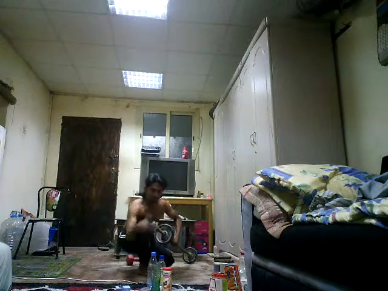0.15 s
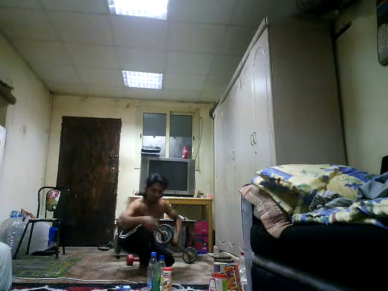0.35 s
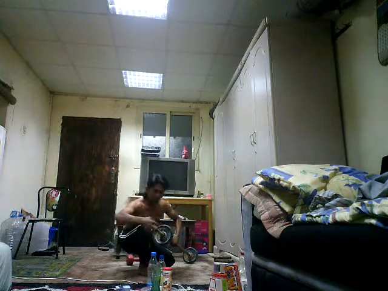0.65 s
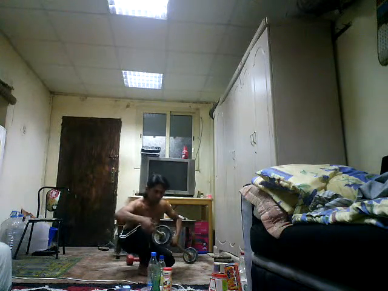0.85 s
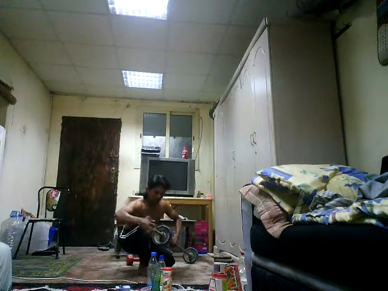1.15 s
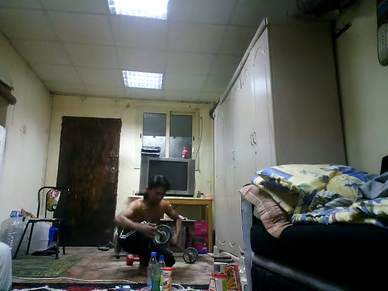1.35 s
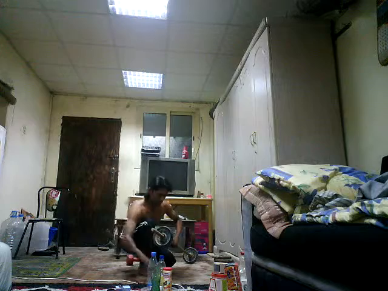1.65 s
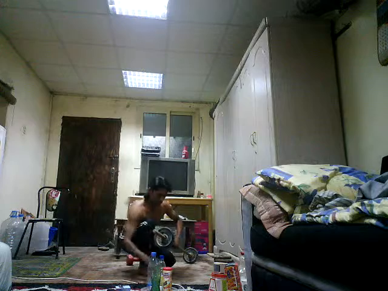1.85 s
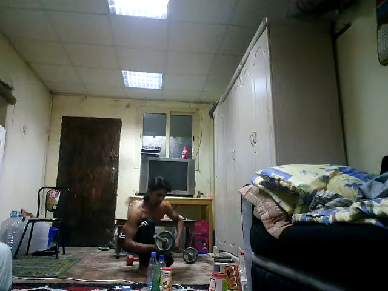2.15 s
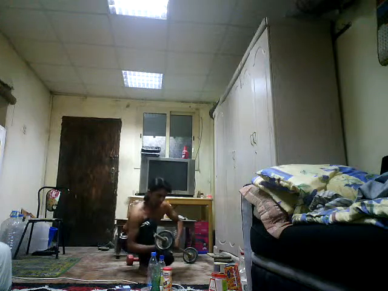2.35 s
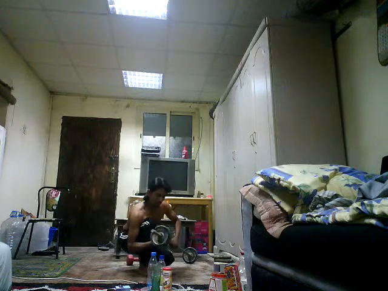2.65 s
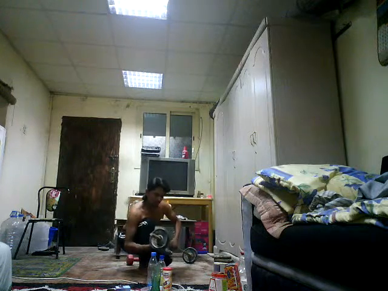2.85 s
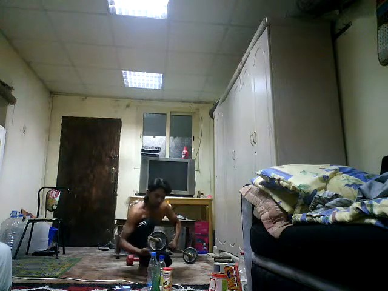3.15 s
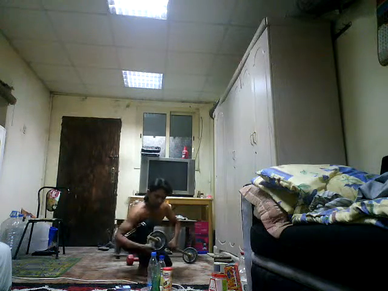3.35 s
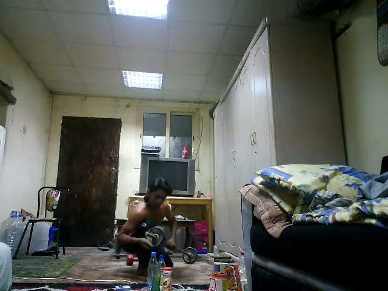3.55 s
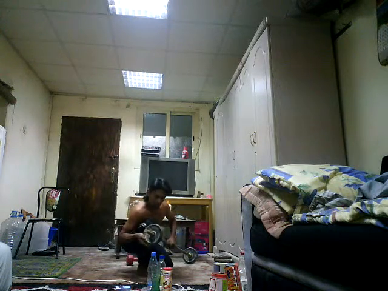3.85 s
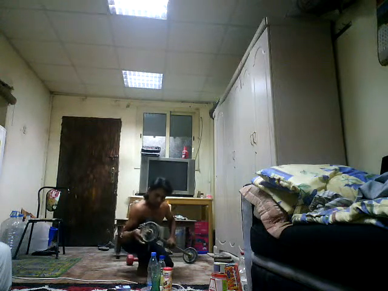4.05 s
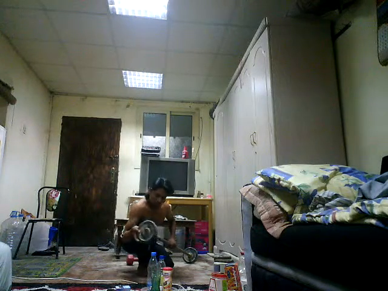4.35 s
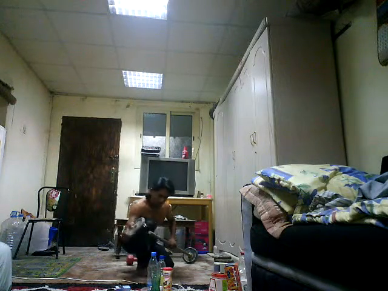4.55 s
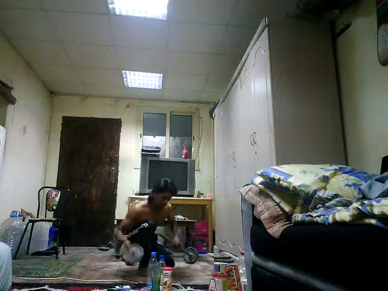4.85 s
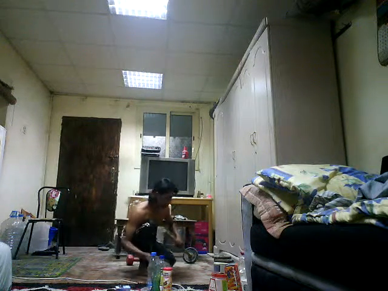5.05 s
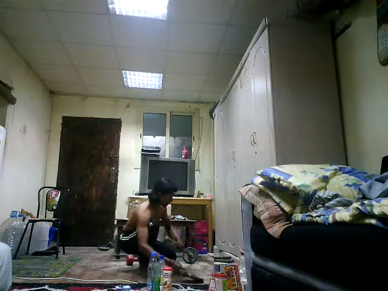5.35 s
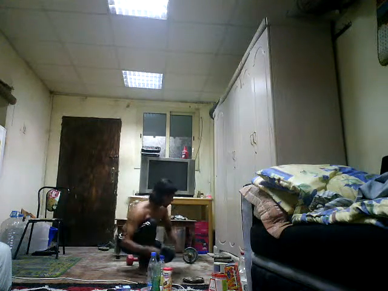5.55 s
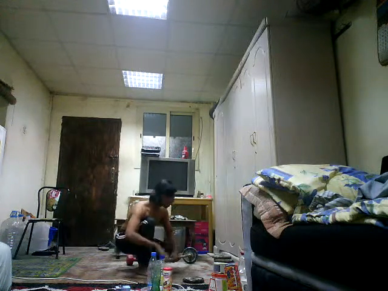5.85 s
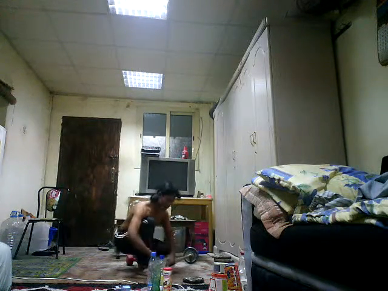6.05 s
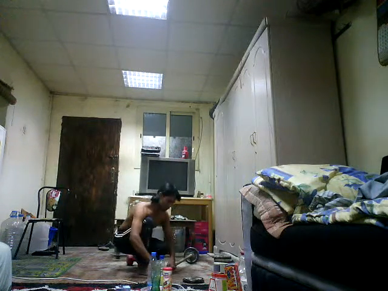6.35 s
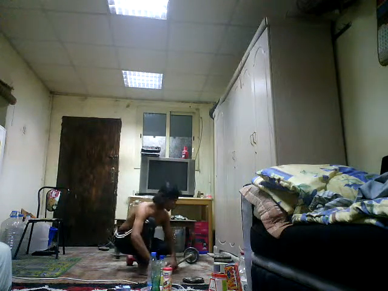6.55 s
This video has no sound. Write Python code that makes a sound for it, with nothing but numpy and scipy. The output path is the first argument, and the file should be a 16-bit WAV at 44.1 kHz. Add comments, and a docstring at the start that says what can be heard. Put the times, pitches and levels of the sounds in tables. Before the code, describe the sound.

In a small, lightly echoing room, a dumbbell collar is spun loose with faint, quickening clinks. A soft floor thump follows, then iron plates scrape, chatter and clank brightly on the steel bar in two bursts. After a short pause a weight drops onto carpet with a loud dull thud and a smaller bounce. The fixed microphone, a few metres away, adds low rumble, hum and steady hiss.

```python
"""In a small bedroom, a dumbbell is stripped: its collar clinks as it is spun loose, then iron plates
scrape and chatter off the steel bar. Weights meet the carpeted floor, last a plate with a dull thud.
Metal is made of noise cracks and dying tones, repeated by tiny slips; thuds add a floor boom.
Shaped noise makes the low rumble and microphone hiss, and sine waves make the hum."""
import sys
import numpy as np
from scipy import signal
from scipy.fft import rfft, irfft, next_fast_len
from scipy.io import wavfile
from scipy.ndimage import map_coordinates

SR = 44100
rng = np.random.default_rng(int(sys.argv[2]) if len(sys.argv) > 2 else 0)


def generate_wav(signal):
    """Clip the signal to [-1, 1] and save it as 16-bit WAV at the path in sys.argv[1]."""
    frames = np.transpose(np.atleast_2d(signal))
    scaled = np.clip(frames, -1, 1) * 32767
    pcm = np.round(scaled).astype(np.int16)
    wavfile.write(sys.argv[1], SR, pcm)


N = 295822
T = np.arange(SR * 3 // 4) / SR  # time within one blow, in seconds

# Tone colour of iron striking hard. Each row: frequency in Hz, relative level in dB.
CLACK_COLOUR = [(300, -30), (700, -12), (1200, -9), (1900, -3), (2500, -3), (3200, 1), (3800, -5),
                (4300, -16), (4900, -21), (5550, -18), (6100, -32), (7300, -46), (11000, -41), (15500, -45)]

CLANK_LEAD_S = 0.015  # a plate scrapes this long before it strikes
NEUTRAL_DB = -24.5  # level of a blow that is neither hard nor soft


def amp(db):
    """Turn decibels into a gain."""
    return 10 ** (np.asarray(db) / 20)


def unit(x):
    """Scale a sound to rms 1."""
    return x / np.sqrt(np.mean(x ** 2) + 1e-20)


def blow(x):
    """Scale each channel to the energy of 30 ms at rms 1, so that short and long blows compare."""
    energy = np.sum(x ** 2, axis=-1, keepdims=True)
    return x / np.sqrt(energy / (0.03 * SR) + 1e-20)


def along(points, hz):
    """Read a curve of (Hz, value) points at any frequency, on a log axis."""
    point_hz, value = np.transpose(points)
    return np.interp(np.log(hz + 1), np.log(point_hz + 1), value)


def filtered(x, gain):
    """Multiply the spectrum by a gain that depends on frequency."""
    n = x.shape[-1]
    padded = next_fast_len(n + 4096, True)  # spare silence between the end and the start
    spectrum = rfft(x, padded) * gain(np.fft.rfftfreq(padded, 1 / SR))
    return irfft(spectrum, padded)[..., :n]


def coloured(x, colour):
    """Shape a sound with a curve of (Hz, dB) points."""
    return filtered(x, lambda hz: amp(along(colour, hz)))


def add(track, s, sound):
    """Mix a sound into the track from time s in seconds."""
    part = track[:, max(0, round(s * SR)):][:, :sound.shape[1]]
    part += sound[:, :part.shape[1]]


def burst(colour, t60, attack):
    """A coloured noise crack that swells and dies with the room's echoes, as mid and side."""
    noise = coloured(rng.standard_normal((2, len(T))), colour)
    return blow(noise * amp(-60 * T / t60) * (1 - np.exp(-T / attack)))


def decays(modes, attack):
    """One dying complex sine for each mode (Hz, dB, seconds to fall 60 dB), swelling as the room fills."""
    hz, db, t60 = np.transpose(modes)[:, :, None]
    swell = 1 - np.exp(-T / attack)
    return amp(db - 60 * T / t60) * np.exp(2j * np.pi * hz * T) * swell


def ring(waves, scatter_db):
    """Each blow rings the modes at new strengths and phases; side is about a quarter cycle off mid."""
    count = len(waves)
    mid = amp(scatter_db * rng.standard_normal(count)) * np.exp(2j * np.pi * rng.random(count))
    side = mid * 1j * np.exp(0.5j * rng.standard_normal(count))
    return blow((np.array([mid, side]) @ waves).real)


def chatter(sound, lead, scrape_db, bounce_db, count=16):
    """Tiny slips swell from nothing up to the main contact, and the parts bounce for as long again."""
    n = max(2, round(lead * SR))
    when = (np.arange(count) + rng.random(count)) * 2 / count - 1  # -1 to 1, main contact at 0
    level = amp(np.where(when < 0, scrape_db, bounce_db))
    size = rng.choice([-1, 1], count) * (1 - abs(when)) * level
    force = np.bincount(((when + 1) * n).astype(int), size, 2 * n + 1)
    force[n] = 1  # the main contact
    return blow(signal.fftconvolve(sound, force[None], axes=1))


def walls(sound, wet_db):
    """Add the room's answer as dying noise, new for each contact; the energy is evened out again."""
    # How long the room answers. Each row: frequency in Hz, time to fall 60 dB in seconds.
    room_fade = [(100, 0.48), (250, 0.502), (600, 0.057), (2000, 0.25), (5000, 0.3), (12000, 0.24)]
    hz, t, z = signal.stft(rng.standard_normal((2, SR // 3)), SR, nperseg=256)
    fade = amp(-60 * t / along(room_fade, hz)[:, None])
    tail = signal.istft(z * fade, SR, nperseg=256)[1]
    tail *= amp(wet_db) / np.linalg.norm(tail[0])
    tail[:, 0] += 1  # the direct sound
    return blow(signal.fftconvolve(sound, tail, axes=1)[:, :sound.shape[1]])


def background():
    """Steady shaped noise gives rumble and microphone hiss; sines of drifting phase give electric hum."""
    # Tone colour of the room rumble. Each row: frequency in Hz, relative level in dB.
    rumble_colour = [(12, -48.5), (20, -23), (59, -1), (82, -13.5), (109, -6), (166, -6), (198, -2.5),
                     (387, -12.5), (431, -14.5), (566, -17.5), (1500, -33), (1950, -58.5), (3300, -120)]
    # Tone colour of the microphone hiss. Each row: frequency in Hz, relative level in dB.
    hiss_colour = [(500, -30.5), (1000, -4.5), (2000, -1.5), (3000, -0.5), (4700, 0.5), (7000, -8.5),
                   (9500, -6.5), (11500, 1), (12900, -1.5), (13400, 0.5), (15500, -4)]
    # Stereo width of both noises. Each row: frequency in Hz, side over mid in dB.
    air_width = [(30, 1), (100, -5.5), (300, -4.5), (700, 0.5), (1500, -2), (4000, 1.5), (7000, 8),
                 (15000, 5.5)]
    # Tones of the electric hum. Each row: frequency in Hz, rms level in dB.
    hum_tones = [(58.5, -86), (115, -63.5), (199, -63), (233, -71)]

    def noise(colour):
        return unit(coloured(rng.standard_normal((2, N)), colour))

    mid, side = amp(-56.0) * noise(rumble_colour) + amp(-57.0) * noise(hiss_colour)
    side = coloured(side, air_width)
    t = np.arange(N) / SR
    for hz, db in hum_tones:
        # the phase wanders smoothly between about two random values a second
        drift = map_coordinates(rng.standard_normal(64), [t * 2.05], mode="mirror")
        mid = mid + amp(db) * np.sqrt(2) * np.sin(2 * np.pi * hz * t + 0.8 * drift)
    return np.array([mid + side, mid - side])


def thuds():
    """The carpet softens each landing; floor and room boom, and the iron gives a short damped clack."""
    # Weights meeting the floor. Each row: start in seconds, relative level in dB,
    # relative level of the metal clack against it in dB, softness in dB per octave (more is duller).
    landings = [(.372, -55.5, -9, -5.5), (1.956, -36.5, -13.5, 4.5), (2.146, -41.5, -18.5, 3.5),
                (2.239, -58, -8, 28), (5.42, -35.5, -15.5, 10), (5.432, -37.5, -25, 13),
                (5.600, -17, -13.5, -1), (5.680, -27.5, -16, 5)]
    # Boom of floor and room. Each row: frequency in Hz, relative level in dB, time to fall 60 dB in seconds.
    boom_modes = [(98, -7, .48), (234, -6, .38), (253, 0, .42), (292, -10, .26), (342, -4, .25),
                  (396, -2, .28), (436, -5, .28), (542, -12, .3), (673, -17, .23), (790, -20, .24),
                  (1012, -18, .25)]
    # Tone colour of the thump. Each row: frequency in Hz, relative level in dB.
    thump_colour = [(35, -40), (65, -5), (95, -5), (150, -6), (250, 8), (420, -4), (600, -11), (850, -27),
                    (1020, -16.5), (1200, -60), (2500, -49)]
    push_hz = 418  # the floor's first give under a weight
    rim_colour = [(900, 4), (2000, -3), (2700, 2.5), (3400, 0), (4500, 13), (7500, 7.5), (15000, 26.0)]

    track, boom = np.zeros((2, N)), decays(boom_modes, attack=0.0051)
    for s, db, clack_db, soft_db in landings:
        # the first push on the floor is short, swelling faster than the room's boom
        push = blow(decays([(push_hz, 0, 0.035)], attack=0.0017).imag)
        thump = burst(thump_colour, t60=0.41, attack=0.00092)
        low = amp(-7.0) * push + amp(1) * thump + amp(-5.0) * ring(boom, scatter_db=1.0)
        low = filtered(low, lambda hz: amp(-soft_db * np.log2(np.clip(hz, 130, 1500) / 250)))
        add(track, s, amp(db + 3.5) * blow(low))
        # the rim touches down just after the face
        rim = coloured(burst(CLACK_COLOUR, t60=0.27, attack=0.00092), rim_colour)
        add(track, s + 0.007, amp(db + clack_db - 3.0) * rim)
    # the small room carries little below its lowest mode
    return signal.sosfilt(signal.butter(4, 70, "highpass", fs=SR, output="sos"), track)


def collar():
    """The loose collar rattles on the thread as the hand turns it: noise cracks with a high, short ring."""
    # Clinks of the collar spun along the bar. Each row: time of the strike in seconds, relative level in dB.
    clinks = [(0.155, -56.5), (0.542, -50), (.611, -49), (.773, -55.5), (.854, -41.5), (.974, -50.5),
              (1.068, -38.5), (1.086, -31.5), (1.178, -30.5), (1.244, -38.5), (1.39, -30.5), (1.403, -33),
              (1.556, -42)]
    # The collar's ring. Each row: frequency in Hz, relative level in dB,
    # time to fall 60 dB in seconds before the extra damping below.
    collar_modes = [(794, -8.5, 0.16), (1300, -34, .2), (1980, 0, 0.082), (2575, -2, 0.36),
                    (3072, 2.5, 0.22), (3040, -33, 0.29), (3520, 3.5, 0.19), (3550, -11, 0.38),
                    (3800, -26, .24), (4070, -7, 0.26), (4570, -10, 0.19), (5182, -21.5, 0.26),
                    (5880, -26.5, 0.36), (6340, -39, 0.25), (6840, -54, 0.14), (7460, -54, 0.14),
                    (8600, -41, 0.14)]
    lead_s = 0.016  # the collar scrapes this long before it strikes
    damping = 50  # extra fall of the ring, dB per second
    small_part = [(2500, -4.0), (4300, 0.5), (7000, 12)]  # the small part sounds brighter: (Hz, dB)

    track, waves = np.zeros((2, N)), decays(collar_modes, attack=0.0038)
    for s, db in clinks:
        crack = burst(CLACK_COLOUR, t60=0.23, attack=0.00082)
        hit = crack + amp(-1) * ring(waves * amp(-damping * T), scatter_db=1.0)
        hit = coloured(hit, small_part)
        clink = chatter(hit, lead_s, scrape_db=4, bounce_db=-28)
        add(track, s - lead_s, amp(db - 3.5) * clink)
    return track


def contacts(s, db, rattle_s, count=3):
    """A blow, then the plate falls back on the bar at uneven intervals, ever more weakly: (s, dB)."""
    rebound_s, fall_db = 0.02, 17  # average time between contacts; fall over the length of a rattle
    after = rebound_s * (np.arange(count) + 0.75 + 0.5 * rng.random(count))
    after = np.append(0, after)
    return zip(s + after, db - fall_db * after / max(rattle_s, 0.001))


def clank(bar, grip, bright_db, force_db):
    """One contact of iron on steel: a dense clack and the bar's ring under the hand, amid tiny slips."""
    bar_db = 6.5  # the bar's ring over the clack, for a neutral blow
    # harder blows ring more (dB per dB of force) and are brighter (dB per octave per dB of force)
    ring_per_db, bright_per_db = 0.1, 0.28

    held = walls(ring(bar * amp(-grip * T), scatter_db=3.5), wet_db=-1)
    clack = burst(CLACK_COLOUR, t60=0.28, attack=0.00025)
    hit = clack + amp(bar_db + ring_per_db * force_db) * held
    slope_db = bright_db + bright_per_db * force_db
    hit = filtered(hit[:, :SR // 2], lambda hz: amp(slope_db * np.log2(np.clip(hz, 1000, 7000) / 3000)))
    return chatter(hit, CLANK_LEAD_S, scrape_db=-2.5, bounce_db=-9)


def plates():
    """Plates catch, slip and rattle on the bar; each blow adds a low knock and the plate's own tones."""
    # Plates against the bar. Each row: time of the strike in seconds, relative level in dB,
    # length of the rattle after it in seconds, level of the low knock in dB.
    clanks = [(2.512, -54.5, 0.047, -46), (2.642, -46.5, 0.018, -38), (2.708, -38, .04, -55),
              (2.738, -28, 0.18, -48), (2.778, -21.5, 0.081, -39.5), (2.831, -17, .045, -38),
              (3.662, -36.5, .015, -43.5), (3.746, -27, 0.088, -39.5), (3.796, -16, 0.023, -38),
              (3.829, -16.5, 0.053, -31.5), (4.069, -22.5, 0.039, -36), (4.137, -30.5, 0.017, -44),
              (4.157, -27, 0.025, -44), (4.189, -12.5, 0.064, -35), (4.227, -18, 0.016, -39.5),
              (4.265, -20.5, 0.043, -43.5), (4.388, -32.5, .03, -44.5), (4.422, -36.5, 0.046, -41),
              (4.471, -28, 0.037, -41.5), (4.498, -21.5, 0.064, -40), (4.527, -30, .08, -52)]
    # Ringing of the loaded bar. Each row: frequency in Hz, relative level in dB.
    bar_modes = [(852.2, -12), (1144, -10.5), (1435, -8.5), (1750, -9.5), (2140, -7.5), (2165, -8.5),
                 (2558, -15), (2611, 0), (2714, -35), (3063, 4.5), (3120, 6), (3190, -6), (3334, -11.5),
                 (3460, -3.5), (3530, -12.5), (4005, -2.5), (4040, -10), (4608, -3.5), (4110, -7.5),
                 (5133, -9), (5557, -6.5), (5710, -10), (6300, -21), (6950, -65), (7820, -62), (8350, -42),
                 (9090, -66.5), (9400, -34.5), (10330, -31.5), (10950, -30.5), (12100, -26.5),
                 (12450, -32.5)]
    # The bar's fade before the hand damps it. Each row: frequency in Hz, time to fall 60 dB in seconds.
    bar_fade = [(800, 0.34), (3100, 0.21), (4600, 0.095), (6400, 0.15), (12000, 0.16)]
    # Tones that sing out of a loosely held plate. Each row: frequency in Hz, relative level in dB,
    # time to fall 60 dB in seconds before the hand damps it.
    plate_modes = [(847, -10.5, 0.21), (1138, -4, 0.21), (1449, -10, .15), (2130, 1.5, 0.54),
                   (2612, -4, 0.17), (3120, 3.5, 0.26), (3610, -5, .2), (3995, -7, .17), (4486, 0.5, 0.26),
                   (5000, -6.5, 0.17), (5350, -7.5, .17), (5850, -18.5, .17), (6370, -14.5, .2),
                   (8350, -34, 0.17), (9770, -30.5, .2)]
    # How the iron is held, loosest as a plate comes away. Each row: time in seconds,
    # damping by the hand in dB per second, brightness of a neutral contact in dB per octave.
    hold_rows = [(2.64, 87, -2), (2.73, 18, -2.5), (2.85, 23, -0.5), (3.66, 86, -2), (3.82, 66.5, 0.5),
                 (4.2, 51.5, -1), (4.55, 60, 5)]
    # Tone colour of the low knock. Each row: frequency in Hz, relative level in dB.
    knock_colour = [(40, -27), (90, -3), (220, 2), (450, -4.5), (700, -8.5), (1300, -17), (3000, -43.5)]
    sing_db = -3  # the plate's tones against the blow, if the hand did not damp them
    choke_s = 0.23  # the grip also weakens these tones as much as this many seconds of its damping

    track = np.zeros((2, N))
    bar = decays([(hz, db, along(bar_fade, hz)) for hz, db in bar_modes], attack=0.0015)
    tones = decays(plate_modes, attack=0.01496)
    hold_s, *hold = np.transpose(hold_rows)
    for s, db, rattle_s, knock_db in clanks:
        grip, bright_db = (np.interp(s, hold_s, column) for column in hold)
        for contact_s, contact_db in contacts(s, db, rattle_s):
            hit = clank(bar, grip, bright_db, db - NEUTRAL_DB)
            add(track, contact_s - CLANK_LEAD_S, amp(contact_db - 1.5) * hit)
        # the weight leans in just before the edges strike
        add(track, s - 0.004, amp(knock_db) * burst(knock_colour, t60=0.41, attack=0.0012))
        singing = ring(tones * amp(-grip * T), scatter_db=-2.0)
        add(track, s, amp(db + sing_db - grip * choke_s) * singing)
    return track


def scene():
    """Mix all layers; the metal and thuds are nearly mono in the bass, wide and a little left in the treble."""
    # Stereo width of the blows. Each row: frequency in Hz, side over mid in dB.
    stereo_width = [(100, -26), (400, -17.5), (1000, -12.5), (2200, -10), (3200, -5.5), (4300, -1.5),
                    (5600, 5), (12000, 5)]
    # Lean to the left. Each row: frequency in Hz, left over right in dB.
    left_lean = [(300, 0), (1000, 1.5), (2500, 3.5), (4000, 1.5), (10000, 0.5)]
    mid, side = thuds() + collar() + plates()
    side = coloured(side, stereo_width)
    pair = np.array([mid + side, mid - side])
    # half of the lean lifts the left, half lowers the right
    pair = filtered(pair, lambda hz: amp(np.outer([0.5, -0.5], along(left_lean, hz))))
    return background() + pair


def record(dry):
    """Round off the sharpest peaks and keep nothing above a top frequency."""
    ceiling, top_hz = 0.85, 15600  # rounding level as a share of full scale; band limit in Hz
    rounded = dry / (1 + (dry / ceiling) ** 8) ** (1 / 8)
    return filtered(rounded, lambda hz: hz < top_hz)


dry = scene()
out = record(dry)
generate_wav(out)
```